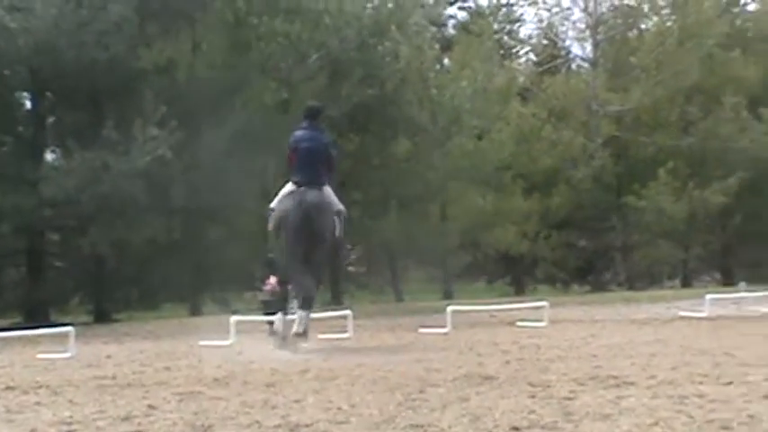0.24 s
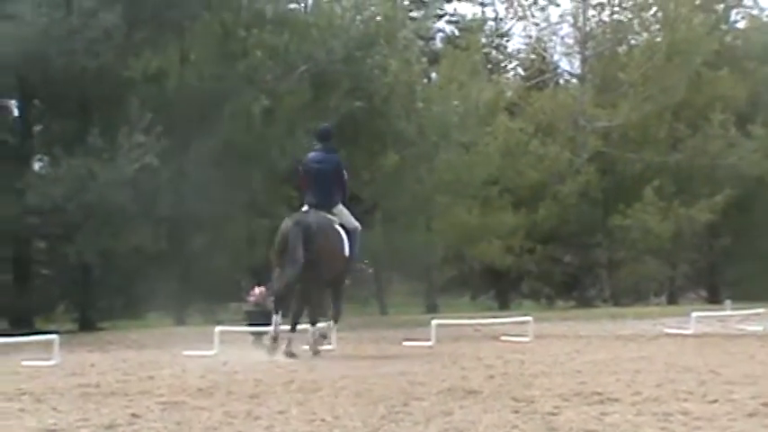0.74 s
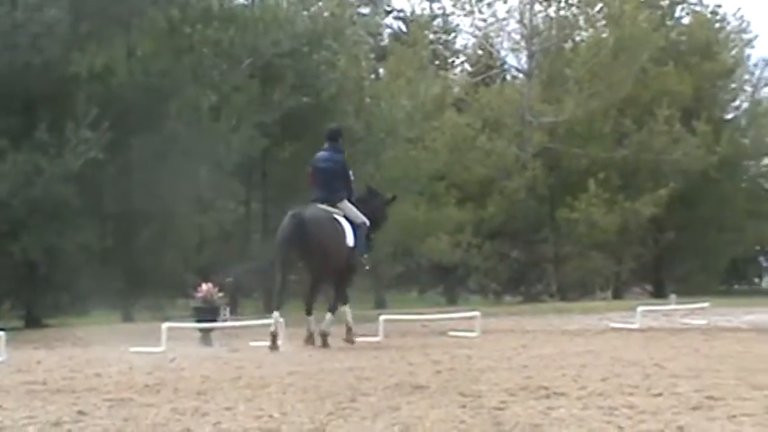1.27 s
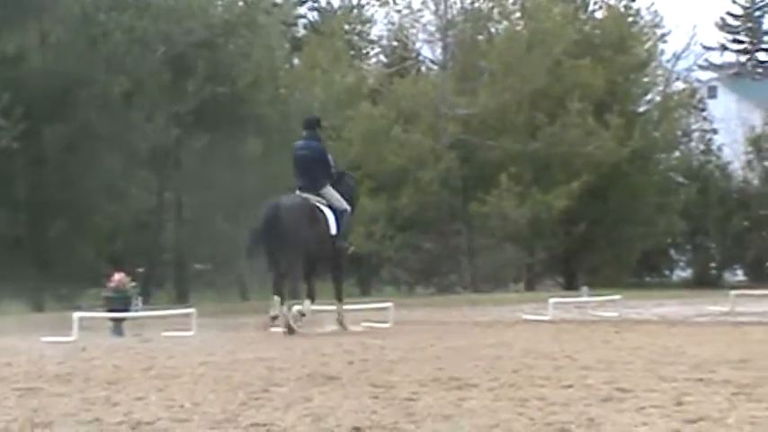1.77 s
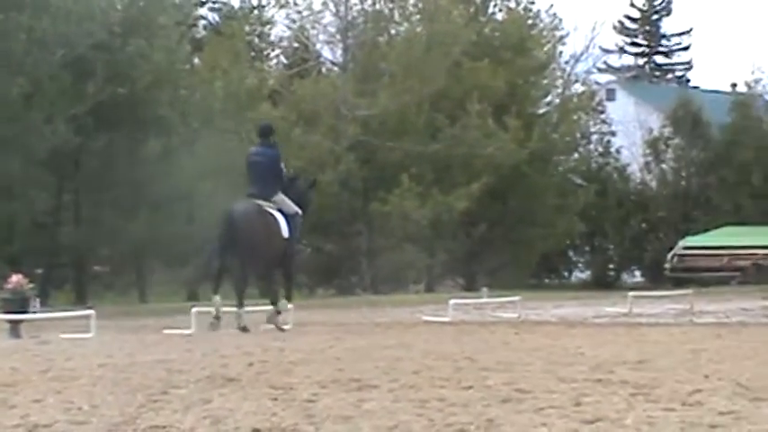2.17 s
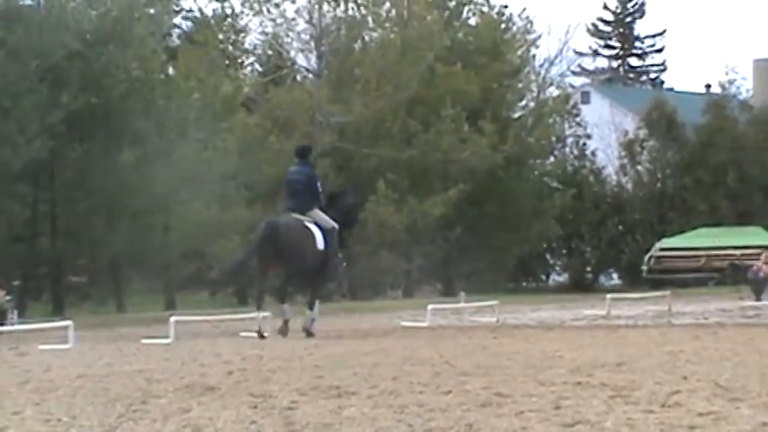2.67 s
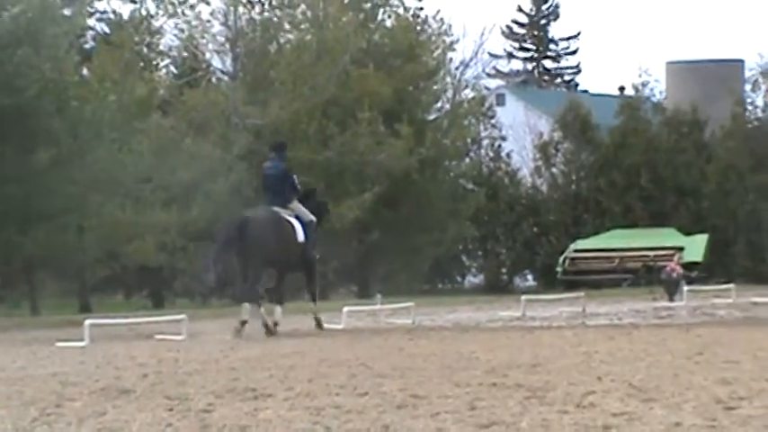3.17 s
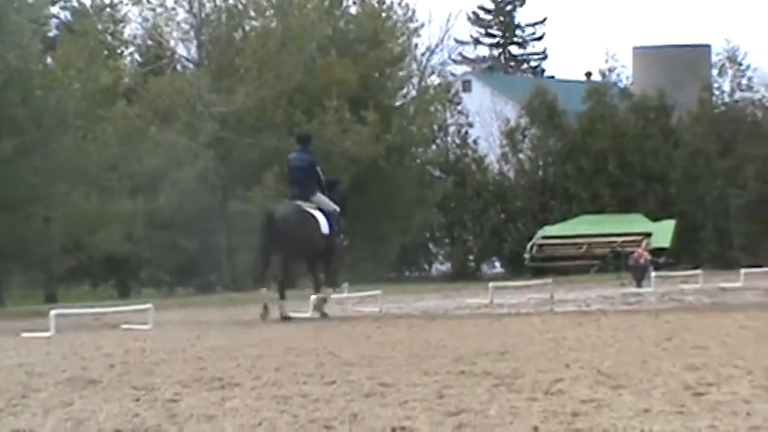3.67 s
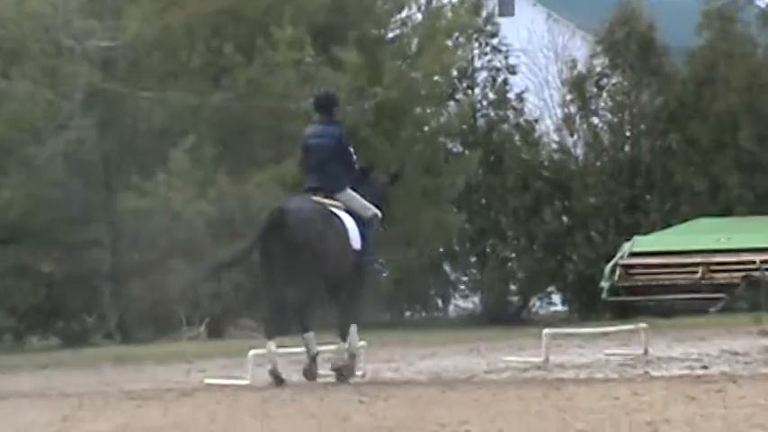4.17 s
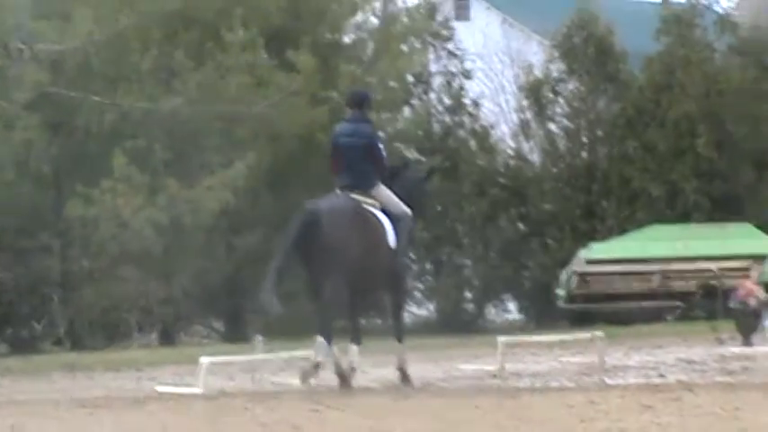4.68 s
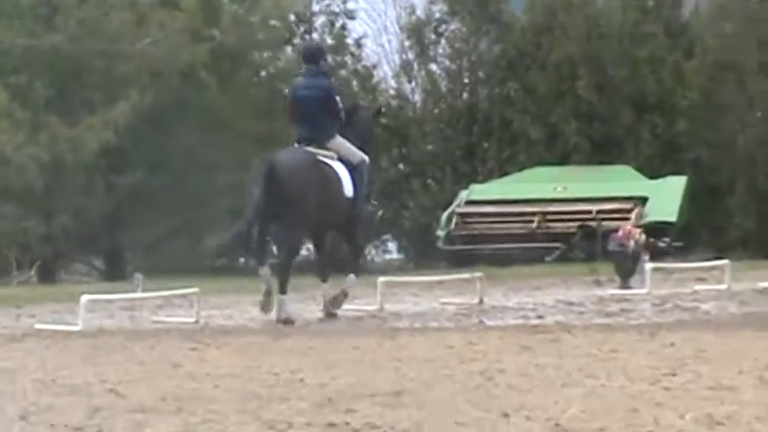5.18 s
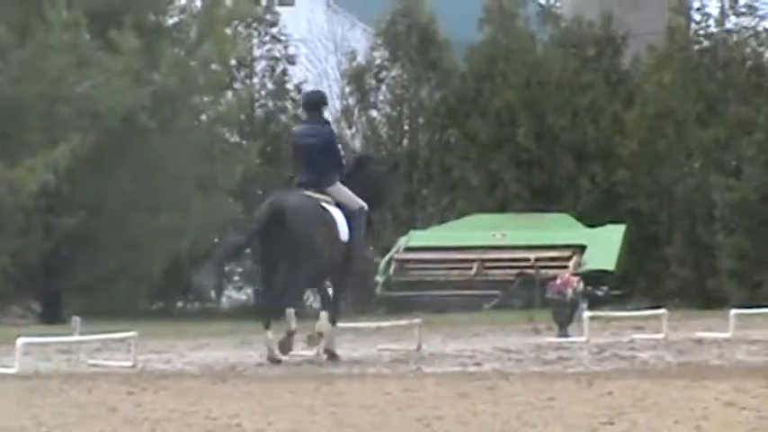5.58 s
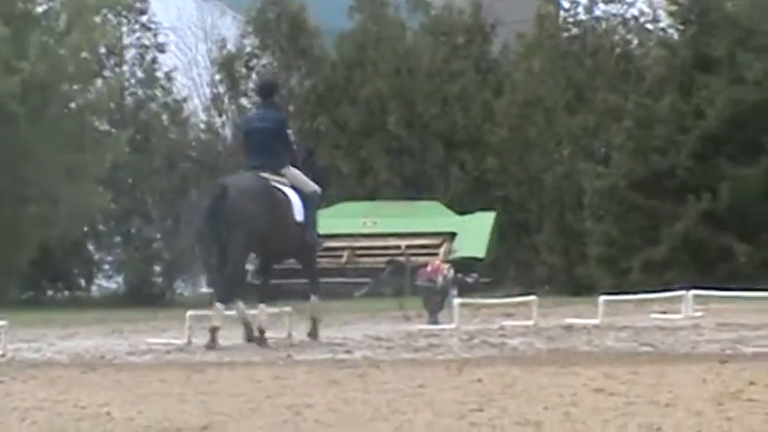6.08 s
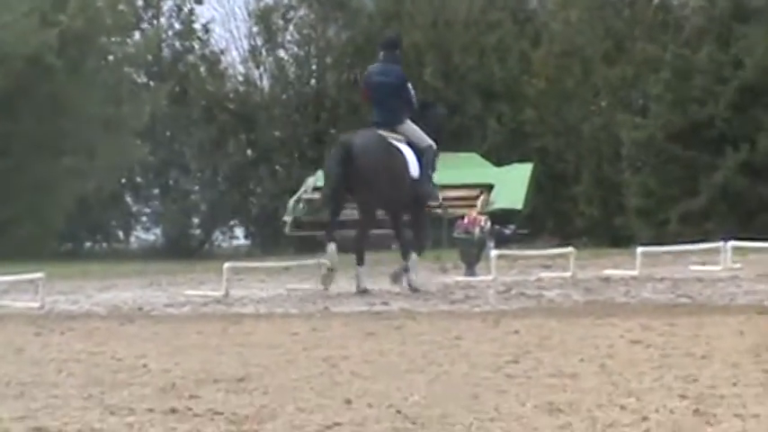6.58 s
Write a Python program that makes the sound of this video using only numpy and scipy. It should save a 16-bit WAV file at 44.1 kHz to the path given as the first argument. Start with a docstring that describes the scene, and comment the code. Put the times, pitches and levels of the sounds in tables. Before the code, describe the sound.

Outdoors by a sand arena, birds in the conifers chirp, chip and twitter throughout, lightly echoed by the trees. A distant horse trots away with very faint, even, dull thuds, then a few clearer ones late on. Close to the microphone a hand-held camera's plastic case ticks irregularly, loudest past the middle, and cloth brushes softly at the start and more briskly at the end. A low airy rush and faint hum lie beneath.

```python
"""A horse trots on a sand arena some way off: each hoof rings damped ground modes and sprays noise.
Birds in the conifers behind sing gliding tones, buzzes and chips, echoed by the trees over a dense twitter.
Close by, a hand-held camera's plastic case ticks as crowded damped modes; cloth rubs as grained noise.
Under it lie shaped noise for open air and a far rush, and the camera's narrow-band hum and sine whine."""
import sys
import numpy as np
from scipy import signal
from scipy.fft import rfft, irfft, next_fast_len
from scipy.io import wavfile

SR = 44100
rng = np.random.default_rng(int(sys.argv[2]) if len(sys.argv) > 2 else 0)


def store_pcm(level_fs):
    """Save levels as 16-bit WAV."""
    pcm = np.round(np.clip(level_fs, -1, 1) * 32767).astype(np.int16)
    wavfile.write(sys.argv[1], SR, np.atleast_2d(pcm).T)


N = 301582

# Open-air spectrum: freq_hz, relative_level_db_per_hz
AIR_COLOUR = [(15, -41), (25, -8.5), (55, -5.5), (110, -1), (221, -5), (322, -7.5), (433, -10), (482, -8),
              (722, -9.5), (1050, -13), (1500, -17.5), (1850, -18.5), (2920, -22.5), (3440, -23),
              (3720, -26.5), (5140, -27), (15500, -28)]
AIR_LEVEL_DB = -52.5
# Far rush over time: time_s, level_db (before trim_db)
RUSH_LEVEL = [(0, -51), (.3, -57), (.9, -55), (2.6, -56), (3.7, -52.5), (5.5, -58), (6.1, -56.5),
              (6.84, -51)]
# Far rush spectrum: freq_hz, relative_level_db_per_hz
RUSH_COLOUR = [(200, -20), (450, 0.5), (650, 3), (950, 4), (1200, -8.5), (1500, -26), (2500, -18)]
# Camera hum bands: centre_hz, width_hz, level_db
HUM_BANDS = [(82.138, 18, -63.5), (116.09, 23, -65.5), (200.6, 41, -65.5)]
WHINE_HZ, WHINE_DB = 15735, -73.5
CUTOFF_HZ = 16000

# Stereo width at two close ports: freq_hz, side_re_middle_db
AIR_WIDTH = [(30, -35), (85, -26), (180, -21), (350, -17), (700, -11), (1500, -6), (4000, -2.5), (9000, -5),
             (14000, -17)]
CLOTH_WIDTH = [(200, -18), (1500, -6), (4500, -16), (7000, -8), (10500, 0), (14000, 1)]
BACK_WIDTH = [(300, -12.5), (2200, -8), (3400, -19), (5000, -5.5), (7000, -0.5), (9800, 9), (12500, -2),
              (15000, -7)]
# Right port's phase lead: freq_hz, lead_rad
AIR_LEAD = [(40, .08), (90, .15), (180, 0.3), (350, 0.58), (700, 0.78), (1400, 0.88), (3500, 0.39),
            (9000, .05)]
CLOTH_LEAD = [(60, .01), (300, .1), (950, 0.92), (1700, 0.9), (3500, 0.27), (9000, .05)]

# Brush, slide, slide back: start_s, attack_s, hold_s, level_db (before trim), sag_db_per_s, release_t60_s
CLOTH_STROKES = [(.06, 0.23, 0.417, -50, -25.5, 0.786), (5.99, 0.095, 0.33, -48, -19, 0.81),
                 (6.37, 0.15, 0.18, -49, -22, 0.68)]
# Spectra of the three strokes: freq_hz, relative_level_db_per_hz
BRUSH_COLOUR = [(100, -31), (250, 7), (1000, 3.5), (1700, -1.5), (2300, -1.5), (3500, -10.5), (5000, -9),
                (6000, -14), (7500, -11.5), (15000, -69.5)]
SLIDE_COLOUR = [(300, -2), (700, 0.5), (1300, -14), (2200, -3.5), (3000, -5), (4000, -1.5), (4900, -7),
                (5600, -5.5), (7300, -7), (10500, -8.5), (13000, -17), (16000, -24.5)]
BACK_COLOUR = [(300, 0), (700, 5), (1300, -1), (2300, 7), (3400, 0.5), (6100, 1), (7500, -3), (10500, -8.5),
               (12700, -2), (14500, -5), (16000, -10)]

# Case ticks: start_s, level_db (before trim_db), knock_db, clack_db, ring_db, snap_db, left_re_right_db
# knock to snap run from low to high, relative to the middle modes
CASE_TICKS = [(0.643, -28.5, 3, -2, -8, -1, 2), (1.366, -38, -4, 4, 11, 18, -.6),
              (1.609, -33, -3, -6, -2, -12, 3), (1.975, -37.5, -6, 4, 2, -9, 2),
              (2.868, -35.5, 10, 5, -9, 18, -.9), (3.063, -39.5, 13, -6, .5, -4, 6),
              (3.108, -32.5, -7, -9, -8, -16, 0), (3.492, -36, 9, 9, -15, -18, -3),
              (3.642, -33.5, 17, -4, -8, -7.5, 1), (3.654, -14, 4.5, 3.5, -1.5, -4.5, 1.5),
              (3.811, -41, -7, 0, -12, -13, 1), (4.219, -35, 12, 4, -2, -9, 3),
              (4.227, -36, 5, 0, -8, -5, 1), (4.241, -44, 0, 0, -6, -6, 3), (4.295, -41.5, 1, -7, -6, 2, 1),
              (4.796, -29, -17, -12, -10, -15, 1.7), (4.945, -27.5, -9, -10, -3, -4, 1.9),
              (5.164, -37, -8, -1, -3, 9, -1), (5.365, -25, -5, -3, 0.5, -5, 0),
              (5.459, -33.5, -6, 2, -1, -8, 2.7)]
# Case mode strengths: freq_hz, relative_level_db
CASE_COLOUR = [(850, 1), (1150, 5), (1550, -10), (2100, 3.5), (4000, 4), (5800, 2), (7600, 1.5),
               (8600, -2.5), (11000, -4), (12500, -11), (14500, -10), (16000, -18)]
# Case mode decay: freq_hz, t60_s
CASE_DECAY = [(1000, 0.018), (4000, 0.01), (8000, 0.016), (14000, 0.0096)]

# Single whistles: start_s, length_s, pitch_hz, rise_share_of_pitch, level_db, rasp_0_to_1
WHISTLES = [(0, 0.042, 3950, -0.18, -52, 0.83), (0.3, 0.065, 4020, -.01, -61, 0.1),
            (0.99, 0.2, 3470, 0.05, -64, 0.03), (1.41, 0.19, 3300, 0.069, -59.5, 0.47),
            (2.347, 0.078, 3000, 0.1941, -70, 0.1), (2.43, 0.05275, 2480, -0.1, -68, 0.14),
            (2.468, 0.04, 3170, 0.024, -67, 0.05), (3.063, 0.016, 9300, 0.0096, -52, 0.2),
            (3.147, 0.091, 2860, -0.025, -65, 0.27), (3.265, 0.33, 3590, 0.004, -65, 0.04),
            (4.009, 0.02, 6000, -0.0036, -68, 0.02), (4.073, 0.02906, 6010, .005, -65.5, 0.04),
            (4.689, 0.03924, 3370, 0.0099, -63, 0.24), (4.889, 0.096, 3270, 0.0135, -61.5, 0.4),
            (5.032, 0.09, 3240, 0.074, -60, 0.2)]
# Set calls by note: delay_s, length_s, start_hz, middle_hz, end_hz, relative_level_db, rasp_0_to_1,
# then optional overtone_db from the second harmonic up; pitches before the call's pitch_ratio
ARCH_NOTES = [(.004, .027, 2350, 3500, 4100, -3, .08), (.026, .046, 4170, 4090, 4000, 1, .05),
              (.069, .015, 3900, 2900, 2200, 2, .15), (.002, .03, 4200, 5800, 6650, -5, .4),
              (.028, .04, 6850, 6800, 6650, -11, .1), (.032, .034, 2750, 2750, 2640, -10, .05)]
WARBLE_NOTES = [(.004, .021, 3700, 4000, 4150, -1, .15), (.023, .027, 4500, 3250, 3120, 1.5, .22),
                (.058, .026, 2780, 2980, 3080, -5, .15), (.08, .018, 3050, 3250, 3800, 3, .2),
                (.098, .018, 3000, 2650, 2620, -1, .2)]
SQUEAK_NOTES = [(0, .055, 3370, 3370, 3370, -7, .03, -5, 4), (.03, .08, 3380, 3390, 3480, 1, .03, -15, -6),
                (.02, .07, 3760, 3660, 3580, -5, .1), (0, .014, 6700, 7900, 8500, 0, .25),
                (.009, .045, 8500, 9000, 9400, 1, .05)]
NASAL_NOTES = [(0, 0.068, 1915, 1940, 2000, -3, 0.12, 1.5, 4.5, -5)]
SLUR_NOTES = [(0, 0.048, 5230, 4390, 3995, -1.2, 0.44), (.046, 0.0366, 3620, 4000, 3840, 0.21, 0.64)]
# Times the set calls are sung: start_s, level_db (before trim_db), pitch_ratio, swell_db_per_s
ARCH_CALLS = [(0.545, -59.5, 1, -20), (.778, -59, 0.99, -40), (2.24, -58, 1, 45), (3.507, -71, 0.9, 0),
              (3.72, -55.5, 1, 2), (4.534, -58.5, 0.96, -50)]
WARBLE_CALLS = [(1.294, -54.5, 1.064, 16), (2.739, -63, 1.06, -15), (4.446, -67.5, 1.05, 85),
                (5.768, -62.5, 1, 0), (6.738, -60.5, 1.01, 0)]
SQUEAK_CALLS = [(1.634, -55, 1.03, 83), (5.105, -50.5, 1.002, -11)]
NASAL_CALLS = [(.09, -62, 0.96, 0), (2.99, -69, 0.98, 0)]
SLUR_CALLS = [(2.04, -58.5, 0.95, 0), (2.066, -62.5, .96, 50), (3.461, -60.5, 1, 0), (5.161, -61, 1, -20)]
# Harsh falling chips: start_s, pitch_hz, level_db (before trim_db)
CHIPS = [(.168, 3300, -62), (.483, 2500, -68), (0.669, 3156, -62.5), (.735, 2848, -58.5), (1.2, 2380, -65),
         (1.508, 3400, -63), (1.509, 4950, -65), (2.507, 2644, -67.5), (2.86, 2680, -66),
         (3.244, 2850, -65), (3.37, 2820, -61.5), (3.586, 2970, -66.5), (3.903, 2990, -65),
         (3.957, 2694, -66.5), (3.51, 3300, -65), (4.456, 3002, -62.5), (4.694, 2600, -68),
         (4.977, 3830, -59), (5.87, 2800, -67)]
CHIP_LENGTH_S, CHIP_FALL_SHARE = 0.0345, 0.162
# Buzzes: start_s, length_s, pitch_hz, level_db, second_harmonic_db, swing_share_of_pitch
BUZZES = [(.19, 0.25, 6080, -64, -30, .06), (0.362, 0.34, 3634, -56.5, -9.5, .04)]
BUZZ_PULSE_HZ, BUZZ_RISE_SHARE = 124.65, 0.057  # mean pulse rate; rise relative to pitch

# Ground modes under a hoof: freq_hz (mean), relative_level_db, t60_s
GROUND_MODES = [(110, -6, 0.079), (227, 11.5, 0.025), (281, -2, 0.027)]
# Faint, evenly spaced thuds, each slightly weaker than the last; level before trim_db
FIRST_STEP_S, STEP_S, STEP_DB, STEP_FADE_DB_PER_S = .137, 0.27, -51.5, -0.5
# Later, wider-spaced and mostly far louder steps: start_s, level_db (before trim_db), extra_deepest_mode_db
LATER_STEPS = [(4.893, -36.5, -2), (5.27, -43, 0), (5.65, -56, -3), (6.029, -37.5, -3), (6.388, -34, 2.5),
               (6.744, -32.5, 0)]


def from_db(db):
    """Decibels to gain."""
    return 10 ** (np.asarray(db) / 20)


def rms_one(x):
    """Scale to unit power."""
    return x / np.sqrt(np.mean(x ** 2) + 1e-20)


def level(rows):
    """Gain over time from (time_s, level_db) rows."""
    return from_db(np.interp(np.arange(N) / SR, *np.transpose(rows)))


def at_hz(points, hz):
    """Read a table on a log-frequency axis."""
    table_hz, values = np.transpose(points)
    return np.interp(np.log(hz + 1e-3), np.log(table_hz), values)


def band(x, low_hz, high_hz):
    """Causal band-pass."""
    edges_hz = [low_hz, min(high_hz, .45 * SR)]
    return signal.sosfilt(signal.butter(2, edges_hz, "band", fs=SR, output="sos"), x)


def drift(rate_hz, size=N):
    """Random line of about unit spread, joining rate_hz new values per second."""
    knots = rng.standard_normal(size // 8 + 2)
    line = np.interp(np.arange(size) * rate_hz / SR, np.arange(len(knots)), knots)
    return line * np.sqrt(3 / 2)  # restores the power lost between knots


def add(out, start_s, sound):
    """Mix a sound in at a time."""
    start = max(0, round(start_s * SR))
    out[..., start:start + sound.shape[-1]] += sound[..., :N - start]


def pan(left_db):
    """Channel gains for a left-right level difference."""
    return from_db(np.array([[left_db], [-left_db]]) / 2)


def noise(colour, width, lead):
    """Coloured noise at two close ports, from middle and side parts; the middle has unit power."""
    size = next_fast_len(N)
    hz = np.arange(size // 2 + 1) * SR / size
    signs = np.array([[1], [-1]])
    mid, side = rfft(rng.standard_normal((2, size))) * from_db(at_hz(colour, hz))
    ports = mid + signs * side * from_db(at_hz(width, hz))
    ports = ports * np.exp(-.5j * signs * at_hz(lead, hz))
    pair = irfft(ports, size)[:, :N]
    return pair / pair.mean(0).std()


def background(rush_trim_db=-5):
    """Open air and a slowly swelling far rush as noise; the camera's hum as narrow bands, its whine a sine."""
    t = np.arange(N) / SR
    air = from_db(AIR_LEVEL_DB) * noise(AIR_COLOUR, AIR_WIDTH, AIR_LEAD)
    rush = from_db(rush_trim_db) * level(RUSH_LEVEL) * noise(RUSH_COLOUR, AIR_WIDTH, AIR_LEAD)
    hum = np.zeros(N)
    for hz, width_hz, db in HUM_BANDS:
        hum_band = band(rng.standard_normal(N), hz - width_hz / 2, hz + width_hz / 2)
        hum += from_db(db) * rms_one(hum_band)
    whine = from_db(WHINE_DB) * np.sqrt(2) * np.sin(2 * np.pi * WHINE_HZ * t)
    return air + rush + hum + whine


def stroke(start_s, attack_s, hold_s, db, sag_db_per_s, release_t60_s):
    """A stroke gathers speed, slackens as it goes on, then dies away."""
    t = np.arange(N) / SR - start_s
    sag_db = sag_db_per_s * np.clip(t - attack_s, 0, hold_s)
    release_db = -60 * np.maximum(t - attack_s - hold_s, 0) / release_t60_s
    return np.clip(t / attack_s, 0, 1) * from_db(db + sag_db + release_db)


def rub(motion, colour, width, grain_db, left_db, uneven_db=1.7, uneven_rate_hz=30):
    """Threads catching on one another make a finely grained hiss that swells with the uneven pressure."""
    hiss = noise(colour, width, CLOTH_LEAD)
    grain = from_db(grain_db * drift(350) + uneven_db * drift(uneven_rate_hz))
    return stroke(*motion) * hiss * grain * pan(left_db)


def cloth():
    """A soft brush, and later a sleeve sliding to and fro."""
    brush, slide, back = CLOTH_STROKES
    return (from_db(1.0) * rub(brush, BRUSH_COLOUR, CLOTH_WIDTH, grain_db=-0.5, left_db=2.5)
            + from_db(-0.5) * rub(slide, SLIDE_COLOUR, CLOTH_WIDTH, grain_db=-0.5, left_db=3.5)
            + from_db(-0.5) * rub(back, BACK_COLOUR, BACK_WIDTH, grain_db=1.3, left_db=2.5))


def ticks(trim_db=-10.0, slip_s=0.0002, port_turn_rad=0.61, after_db=-17, after_t60_s=0.048,
          tail_db=-24, tail_t60_s=0.26, mode_count=56):
    """Slips in the grip ring differing mixes of the case's crowded modes, out of step at the two ports."""
    out, t = np.zeros((2, N)), np.arange(int(.08 * SR)) / SR
    no_bass = signal.butter(6, 750, "high", fs=SR, output="sos")
    for s, db, knock_db, clack_db, ring_db, snap_db, left_db in CASE_TICKS:
        weight = [(1200, knock_db), (2200, clack_db), (4000, 0), (6500, ring_db), (10000, snap_db)]
        hz = np.linspace(900, 15800, mode_count)[:, None] + rng.uniform(-90, 90, (mode_count, 1))
        phase = 2 * np.pi * (hz * t + rng.random((mode_count, 1)))
        main_fade = from_db(-60 * t / at_hz(CASE_DECAY, hz))
        after_fade = from_db(after_db - 60 * t / after_t60_s)
        modes = from_db(at_hz(CASE_COLOUR, hz) + at_hz(weight, hz)) * (main_fade + after_fade)
        tick = np.array([np.sum(modes * np.sin(phase + side * port_turn_rad), axis=0) for side in (-1, 1)])
        tick *= 1 - np.exp(-(t / slip_s) ** 2)
        tick /= tick.mean(0)[t < .003].std()
        # faint scatter off the hand and body
        scatter = rms_one(band(rng.standard_normal(tick.shape), 1300, 5000))
        tick += scatter * from_db(tail_db - 60 * t / tail_t60_s)
        add(out, s + 0.00045, from_db(db + trim_db) * signal.sosfilt(no_bass, tick) * pan(left_db))
    return out


def note(length_s, start_hz, middle_hz, end_hz, rasp, overtones_db=(), flutter=0.095,
         flutter_rate_hz=900, shake=0.33, grow_db_per_s=25):
    """A bird's tone swells as it glides through three pitches; rasp shakes its pitch and strength."""
    size = max(64, int(length_s * SR))
    u = np.linspace(0, 1, size)
    glide_hz = np.polyval(np.polyfit([0, .5, 1], [start_hz, middle_hz, end_hz], 2), u)
    hz = glide_hz * (1 + flutter * rasp * drift(flutter_rate_hz, size=size))
    phase = 2 * np.pi * np.cumsum(hz) / SR
    swell_db = grow_db_per_s * length_s * (u - .5) + 1.3 * drift(59.0, size=size)
    swell = signal.windows.tukey(size, .45) * from_db(swell_db)
    swell = swell * (1 + shake * rasp * drift(415, size=size))
    overtones = sum(from_db(db) * np.sin(k * phase) for k, db in enumerate(overtones_db, 2))
    return np.sqrt(2) * rms_one(swell) * (np.sin(phase) + overtones)


def buzz(length_s, hz, overtone_db, swing_share, grain_db=1.0):
    """A far bird's drawn-out note, its pitch swinging too fast to follow."""
    size = int(length_s * SR)
    pulse_hz = BUZZ_PULSE_HZ * (1 + 0.15 * drift(60.7, size=size))
    swing = np.sin(2 * np.pi * np.cumsum(pulse_hz) / SR) + 0.59 * drift(500, size=size)
    rise = BUZZ_RISE_SHARE * np.linspace(-.5, .5, size)
    phase = 2 * np.pi * np.cumsum(hz * (1 + rise + swing_share * swing)) / SR
    swell = signal.windows.tukey(size, .45) * from_db(grain_db * drift(254, size=size))
    tone = np.sin(phase) + from_db(overtone_db) * np.sin(2 * phase)
    return np.sqrt(2) * rms_one(swell) * tone


def chip(hz, rasp_rate_hz=1500):
    """A hoarse note, shaken so hard that only a falling band of noise is left."""
    size = int(CHIP_LENGTH_S * SR)
    fall = CHIP_FALL_SHARE * np.linspace(.5, -.5, size)
    phase = 2 * np.pi * np.cumsum(hz * (1 + fall)) / SR
    hoarse = (drift(rasp_rate_hz, size=size) * np.sin(phase)
              + drift(rasp_rate_hz, size=size) * np.cos(phase))
    return rms_one(signal.windows.tukey(size, .6) * hoarse)


def sing(notes, calls, trim_db):
    """One set call, repeated at different strengths and pitches."""
    out = np.zeros(N)
    for s, db, pitch, swell_db_per_s in calls:
        for delay_s, length_s, start, middle, end, note_db, rasp, *overtones_db in notes:
            tone = note(length_s, start * pitch, middle * pitch, end * pitch, rasp, overtones_db,
                        flutter=0.14217)
            tone_db = db + note_db + swell_db_per_s * delay_s + trim_db
            add(out, s + delay_s, from_db(tone_db) * tone)
    return out


def song(chip_trim_db=6.0):
    """The nearer birds: set calls, whistles, buzzes and harsh falling chips."""
    out = sing(ARCH_NOTES, ARCH_CALLS, trim_db=-2.0)
    out += sing(WARBLE_NOTES, WARBLE_CALLS, trim_db=1.0)
    out += sing(SLUR_NOTES, SLUR_CALLS, trim_db=1.5)
    out += sing(SQUEAK_NOTES, SQUEAK_CALLS, trim_db=-0.7)
    out += sing(NASAL_NOTES, NASAL_CALLS, trim_db=4.0)
    for s, length_s, hz, rise_share, db, rasp in WHISTLES:
        half_rise_hz = hz * rise_share / 2
        tone = note(length_s, hz - half_rise_hz, hz, hz + half_rise_hz, rasp, flutter=0.099)
        add(out, s, from_db(db) * tone)
    for s, length_s, hz, db, overtone_db, swing_share in BUZZES:
        add(out, s, from_db(db) * buzz(length_s, hz, overtone_db, swing_share))
    for s, hz, db in CHIPS:
        add(out, s, from_db(db + chip_trim_db) * chip(hz))
    return out


def trees(x, t60_s=0.52, gap_s=0.0016):
    """Trunks and branches scatter a call into a thin diffuse tail."""
    t = np.arange(SR) / SR
    scatter = rng.standard_normal((2, SR)) * from_db(-60 * t / t60_s) * (1 - np.exp(-t / gap_s))
    scatter = scatter / np.sqrt(np.sum(scatter[0] ** 2))
    return signal.fftconvolve(x[None], scatter, axes=1)[:, :N]


def flock(calls, per_s=60, spread=0.25, answer_db=-9, answer_s=0.16, idle_db=-73):
    """Many more birds twitter deep in the trees, stirred up by each nearer call and blurred by branches."""
    twitter = np.zeros(N)
    for when, pitch, length, start, end in rng.random((int(per_s * N / SR), 5)):
        hz = 2600 + 1750 * pitch
        start_hz = hz * (1 + spread * (start - .5))
        end_hz = hz * (1 + spread * 2 * (end - .5))
        add(twitter, when * N / SR, note(0.0303 + 0.059 * length, start_hz, hz, end_hz, 0.404))
    keep = np.exp(-1 / (answer_s * SR))
    stir = signal.lfilter([1 - keep], [1, -keep], np.abs(calls))
    gain = from_db(idle_db) + from_db(answer_db) * stir
    return gain * rms_one(trees(twitter, t60_s=0.055)) * pan(6.3)


def birds(calls, echo_db=-6, echo_top_hz=7000, slap_s=0.091, slap_db=-17, left_db=6.5):
    """The calls come from the tree line, with one distinct reflection and a duller, diffuse echo."""
    direct = np.array([np.roll(calls, 2), calls])  # right port leads by two samples
    dull = band(calls, 1270, echo_top_hz)
    echo = from_db(echo_db) * trees(dull)
    add(echo, slap_s, from_db(slap_db) * dull)
    return (direct + echo) * pan(left_db)


def hoofs(trim_db=-1.0, sand_db=-20, sand_t60_s=0.29, faint_count=12):
    """Each landing pushes the ground into a short dull ring and sprays a little sand."""
    out, t = np.zeros(N), np.arange(int(.2 * SR)) / SR
    faint_times_s = FIRST_STEP_S + STEP_S * np.arange(faint_count)
    faint_steps = [(s, STEP_DB + STEP_FADE_DB_PER_S * s, 0) for s in faint_times_s]
    for s, db, depth_db in faint_steps + list(LATER_STEPS):
        thud = np.zeros(len(t))
        for k, (hz, mode_db, t60_s) in enumerate(GROUND_MODES):
            fade = from_db(mode_db + depth_db * (k == 0) - 60 * t / t60_s)
            step_hz = hz * (1 + 0.05 * rng.normal())
            thud += fade * np.sin(2 * np.pi * step_hz * t)
        spray = rms_one(band(rng.standard_normal(len(t)), 330, 1900))
        spray = spray * from_db(sand_db - 60 * t / sand_t60_s)
        onset = 1 - np.exp(-t / 0.0033)
        add(out, s + 0.0020815, from_db(db + trim_db) * (thud + spray) * onset)
    return out


def scene():
    """Sum of all sources at the microphone."""
    calls = song()
    return hoofs() + birds(calls) + flock(calls) + ticks() + cloth() + background()


def record(dry):
    """Steep elliptic low-pass at CUTOFF_HZ."""
    return signal.sosfilt(signal.ellip(12, .1, 70, CUTOFF_HZ, fs=SR, output="sos"), dry)


dry = scene()
out = record(dry)
store_pcm(out)
```